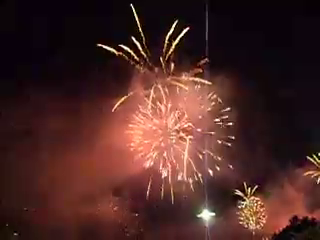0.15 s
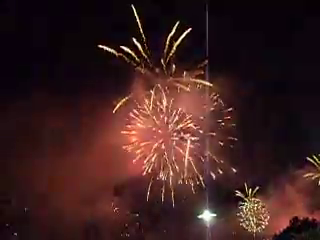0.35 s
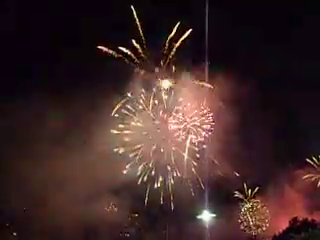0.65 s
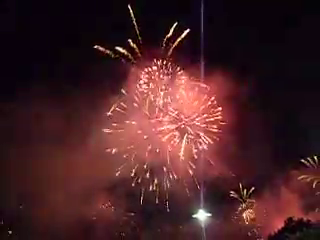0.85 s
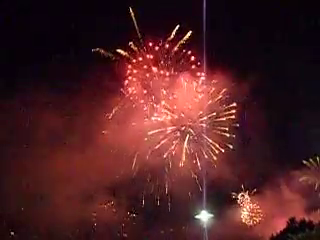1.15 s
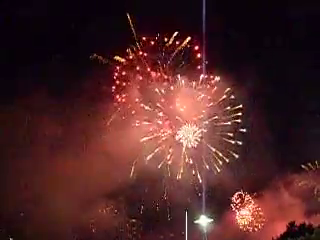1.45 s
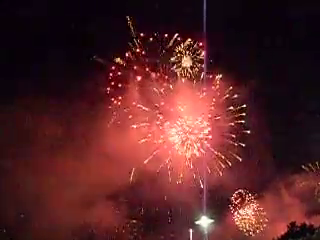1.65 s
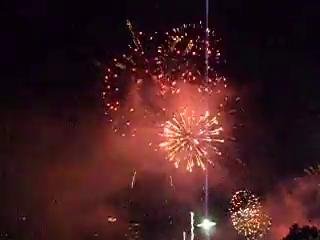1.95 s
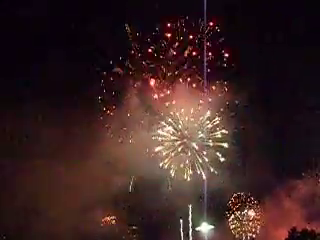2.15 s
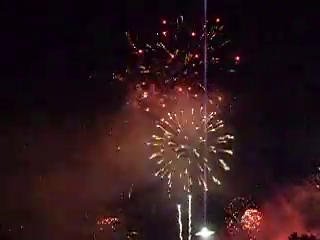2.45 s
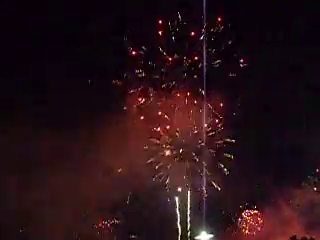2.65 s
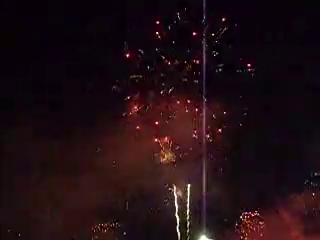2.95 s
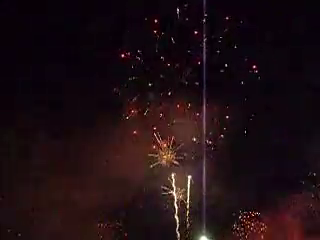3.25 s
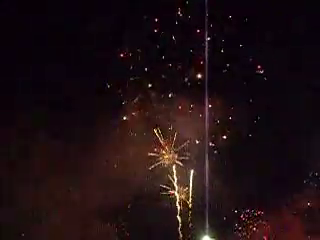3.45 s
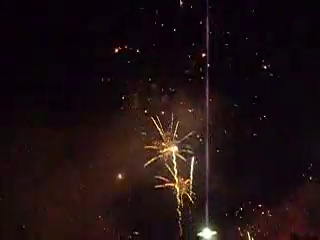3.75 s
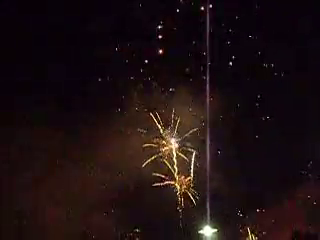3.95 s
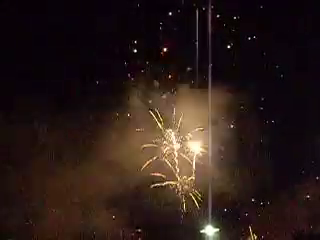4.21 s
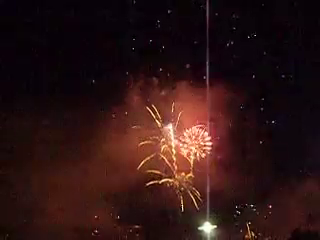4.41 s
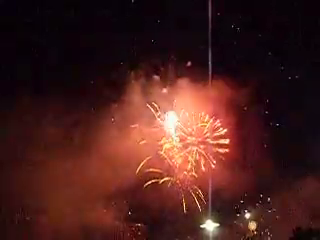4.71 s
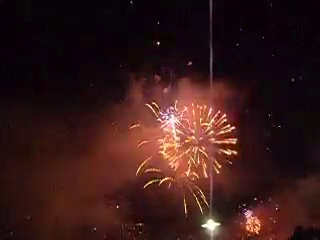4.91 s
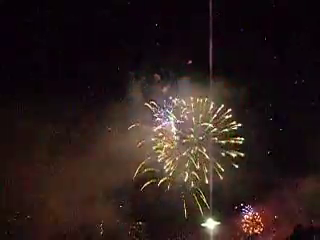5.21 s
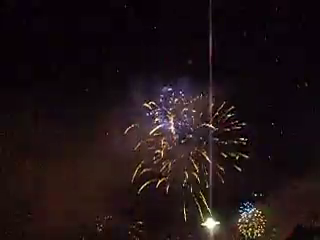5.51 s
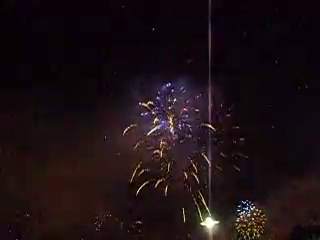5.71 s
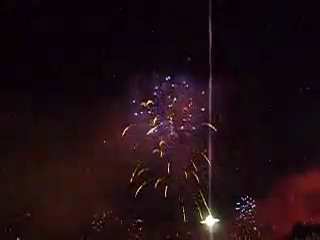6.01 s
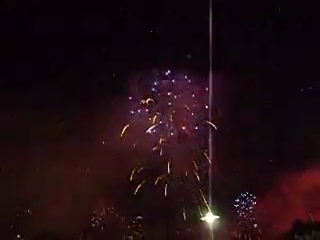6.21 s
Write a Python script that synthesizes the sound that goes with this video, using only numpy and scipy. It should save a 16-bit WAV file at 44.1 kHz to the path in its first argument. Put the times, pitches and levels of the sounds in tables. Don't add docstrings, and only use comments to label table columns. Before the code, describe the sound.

A busy fireworks display heard from open ground: irregular booms, some rounded and dull, others steep and cracking, with light pops between them and deep launch thumps beneath. Echoes slap back quickly and fade slowest in the bass, merging with distant shells into a continuous rumble. Bursts crowd together after the middle, then late strong bangs give way to weaker pops. The small microphone flattens and distorts the big hits.

```python
import sys
import numpy as np
from scipy import signal
from scipy.io import wavfile
from scipy.ndimage import uniform_filter1d

SR = 44100
rng = np.random.default_rng(int(sys.argv[2]) if len(sys.argv) > 2 else 0)


def boost_factor(decibels):
    exponent = np.asarray(decibels, float) / 20
    return 10 ** exponent


def to_wav(sig):
    pcm = np.clip(np.atleast_2d(sig), -1, 1) * 32767
    pcm = np.round(pcm).astype(np.int16)
    wavfile.write(sys.argv[1], SR, pcm.T)


N = 280917

# (time [s], overpressure [dB], steep share of the front [0-1], echo roll [dB], crack [dB])
LARGE_SHELLS = [(0.076, -3.5, 0.1, -9, -10.5), (0.241, 1.5, .05, -9, -21), (0.5989, 11, 0.4, 0, 2),
                (0.6904, 0, 0.5, -17.5, -7), (0.967, -0.5, 0, -13.5, -18), (1.3906, 10, 1, 0.5, -9.5),
                (1.4534, 5, .05, -9.5, -14), (1.4745, 4.5, .2, -15, -21), (1.5431, 3, 0.95, -1, 6),
                (1.7266, 0, .05, -20.5, -18.5), (2.2111, 0, 0, -3, -8), (2.4537, 15, 0.9, 1.5, 12),
                (2.509, 8.5, 0.2, -9, -12), (3.167, -8, .15, -8.5, -6.5), (3.3997, 3, .03, -5.5, -11),
                (3.648, 5, .05, -4, -8.5), (3.7355, -1.7, .6, -19, -28), (3.879, 11, .99, -8, -4.5),
                (3.947, -0.5, .3, -10, -14), (4.2205, -3, 0.6, -8.5, -21),
                (4.4335, -2.5, .05, -12.5, -20.5), (5.1853, 11, .1, 2, -12), (5.5517, 8, .99, -2.5, 9.5),
                (6.0311, -6, 0.4, -11.5, -12)]
# (time [s], overpressure [dB], echo roll [dB], crack [dB], boom [dB])
SMALL_SHELLS = [(0.5757, -6.5, -18.5, -23, -11.5), (0.668, -15, -7, -19, -1), (0.7331, -5.5, -22, -14, -23),
                (1.165, -9, -30, -15.5, -19), (2.2926, -7, -15, -7, -2.5), (2.7642, -1.5, -17.5, -21, -4.5),
                (3.091, -9.5, -27, -16.5, -23), (3.2261, -7, -15, -19, -15), (3.2374, -1.5, -16.5, -18, -7),
                (3.489, -2, -17, -28, -19), (3.632, -2.2, -10, -33, -14), (3.7162, -3.5, -7, -28.5, -12.5),
                (3.893, 0.3, -21, -12.5, -12), (4.1557, -2.5, -12.5, -24, -7),
                (4.369, -4, -18.5, -19, -12.5), (4.5298, -3.5, -14, -16, -23),
                (4.6254, -6.5, -27, -22, -13), (4.767, -3, -14, -17, -8), (5.0168, -9.5, -27, -27, -19),
                (5.2487, -13, -9, -13, -4), (5.374, -2.5, -11.5, -22, -12),
                (5.6427, -2.5, -19, -28.5, -13.5), (6.0096, -13, -17, -32.5, -11)]
# (time [s], overpressure [dB], steep share [0-1])
WALL_RETURNS = [(0.0053, -1.5, 0.2), (0.0229, -1.5, 0), (0.0567, 0, 0.2), (1.1817, -17, .3),
                (1.5624, 0.5, 0.1), (1.611, -1.5, .05), (1.6308, 0, .22), (2.522, 2, .2),
                (2.556, -0.5, 0.2), (5.2686, 1, .3), (5.2982, -2.5, .15)]
# (delay [s], level [dB])
BOUNCES = [
    (.0055, -15),
    (0.01, -14.5),
]
# (time [s], crack [dB], echo roll [dB], boom [dB])
STARS = [(0.0045, -16, -4, -2.5), (0.054, -21, -12, -8), (0.1804, -29, -23, -17),
         (0.5343, -33, -25.5, -14.5), (1.0977, -24.5, -34, -16), (1.1827, -17, -30, -18),
         (1.354, -30, -20.5, -3.5), (1.707, -17, -22, -22), (1.7628, -22, -15.5, -1.5),
         (2.0014, -26, -27, -29), (2.083, -20.5, -23.5, -35), (2.25, -9, -11.5, -17),
         (2.2712, -17, -11, -2), (2.7965, -8, -14, -8), (2.809, -21, -31, -26.5),
         (3.072, -31, -15.5, -11.5), (3.1058, -20, -19, -30), (3.1835, -14, -30, -22),
         (3.2836, -14.5, -19, -3), (3.4668, -20, -13.5, -6.5), (3.984, -26, -31, -16),
         (4.2041, -21.5, -14.5, -1), (4.4841, -29, -15.5, -23), (4.6414, -18.5, -34, -17),
         (5.298, -22, -38, -13), (5.5905, -20, -13.5, -19), (5.6203, -20, -6, 2.5), (5.8412, -26, -22, -17),
         (6.0592, -35, -20, -27), (6.0924, -32, -15.5, -9)]
# (rise [s], quick t60 [s], slow t60 [s], slow part [dB], offset [dB])
ECHO_DECAY = [
    (0.012, 0.21, 0.93, -10.5, -6.5),
    (0.0017, 0.13, 0.8, -12.5, -6.5),
    (0.0032, 0.055, 0.72, -11, -7),
]
# (frequency [Hz], level per Hz [dB])
LOW_SPECTRUM = [(59, -32), (100, -1.5), (151, -1), (220, -3.5), (303, -12), (400, -15), (520, -50),
                (880, -120)]
MIDDLE_SPECTRUM = [(200, -44), (300, 0.5), (360, -8.5), (450, 3), (650, -2), (860, -4), (1050, -8.5),
                   (1200, -23), (1350, -33), (1600, -45)]
BRIGHT_SPECTRUM = [(900, -13), (1200, -12), (1500, -5), (2000, -2.5), (2600, -4.5), (3200, -8),
                   (3700, -13.5), (5000, -14), (6400, -18), (7200, -31.5), (7900, -40), (9000, -70)]
# (time [s], thump [dB])
MORTARS = [(0.01, -17), (.35, -17), (.62, -8), (.76, -17), (1.0, -17), (1.27, -15), (1.42, -12),
           (1.54, -5.5), (2.05, -12.5), (2.3, -13.5), (2.46, -3), (3.05, -11.5), (3.18, -12), (3.4, -17),
           (3.7, -16), (3.87, -13), (3.97, -16), (4.2, -8.5), (4.51, -14), (4.76, -10.5), (5.21, -11.5),
           (5.37, -12), (6.0, -13.5)]
# (frequency [Hz], level per Hz [dB])
DEEP_SPECTRUM = [(12, -33), (20, -9.5), (54, 1.5), (120, -1), (160, -20.5), (260, -120)]
# (time [s], level [dB])
FAR_RUMBLE = [(0.0, -18.5), (0.44, -29), (0.82, -23), (1.08, -27.5), (1.42, -25.5), (1.58, -16.5),
              (1.83, -24.5), (2.23, -26.5), (2.41, -22), (2.87, -26.5), (3.53, -25), (5.11, -28),
              (5.39, -24.5), (6.37, -29)]
# (mean [dB], share of the swing [factor])
RUMBLE_RANGES = [
    (-21, 1.1),
    (-27.5, .9),
    (-46, 1),
]


def lowpass(x, order, hz):
    return signal.sosfilt(signal.butter(order, hz, fs=SR, output="sos"), x + 1e-18)


def bandpass(x, order, low_hz, high_hz):
    sos = signal.butter(order, [low_hz, high_hz], "band", fs=SR, output="sos")
    return signal.sosfilt(sos, x + 1e-18)


def impulses(at, level):
    train = np.zeros(N)
    np.add.at(train, at, level)
    return train


def shell_rows():
    rows = []
    for s, blast_db, steep, roll_db, crack_db in LARGE_SHELLS:
        boom_db = roll_db + 3.5 + 0.1 * (blast_db - roll_db)
        rows.append((s, blast_db, steep, roll_db, crack_db, boom_db))
    for s, blast_db, *rest in SMALL_SHELLS:
        rows.append((s, blast_db, 0.06, *rest))
    return np.array(rows)


def blasts():
    push_ms, push_growth = 1.4, 0.2
    gain_db, fade, far_air_hz = 1.06, 1.91, 1650
    steep, rounded = np.zeros((2, N + 2048))
    t_ms = np.arange(2048) / SR * 1000
    for s, db, share in [*shell_rows()[:, :3], *WALL_RETURNS]:
        u = t_ms / (push_ms * boost_factor(push_growth * db))
        wave = -boost_factor(db + gain_db) * np.cos(np.pi / 2 * u) * np.exp(-(u / fade) ** 2)
        i = round(s * SR)
        steep[i:i + 2048] += share * wave
        rounded[i:i + 2048] += wave
    rounded = lowpass(rounded[:N], 3, far_air_hz)
    steep = steep[:N] - lowpass(steep[:N], 2, far_air_hz)
    out = rounded + steep
    for delay_s, db in BOUNCES:
        out = out + boost_factor(db) * np.pad(rounded, (round(delay_s * SR), 0))[:N]
    return out


def cracks(at, crack_db, edge_db):
    edge_hz = 4070
    snap = impulses(at, -boost_factor(crack_db + 20.5))
    edge = impulses(at, -boost_factor(crack_db + edge_db + 16.5))
    snap = lowpass(bandpass(snap, 1, 1500, edge_hz), 2, edge_hz)
    return snap + bandpass(edge, 1, edge_hz, 6800)


def knocks(at, roll_db):
    kicks = lowpass(impulses(at, -boost_factor(roll_db - 1)), 2, 1790)
    r = boost_factor(-60 / (0.02 * SR))
    out = 0
    for hz in [439, 769]:
        w = 2 * np.pi * hz / SR
        out = out + signal.lfilter([0, np.sin(w)], [1, -2 * r * np.cos(w), r * r], kicks)
    return out


def scattered(at, bright_db):
    late, size, edge = rng.random((3, len(at), 12))
    delay_s = late * 0.073 + 0.003
    when = np.minimum(at[:, None] + (delay_s * SR).astype(int), N - 1)
    db = bright_db[:, None] - 5 - 10 * late + 4 * (2 * size - 1)
    return cracks(when.ravel(), db.ravel(), -22 + 14 * edge.ravel())


def bursts():
    s, _, steep, roll_db, crack_db, boom_db = shell_rows().T
    star_s, star_crack_db, star_roll_db, star_boom_db = np.transpose(STARS)
    edge_db = np.r_[-19.5 + 9 * steep, np.full(len(star_s), -22.5)]
    low_db = np.r_[boom_db, star_boom_db]
    roll_db = np.r_[roll_db, star_roll_db]
    crack_db = np.r_[crack_db, star_crack_db]
    bright_db = roll_db - 13.5 + 0.2 * (crack_db - roll_db)
    return np.r_[s, star_s], crack_db, edge_db, [low_db, roll_db, bright_db]


def fading(kicks, t60):
    return signal.lfilter([1], [1, -boost_factor(-120 / (t60 * SR))], kicks + 1e-18)


def roll(at, burst_db, far_db, rise, quick, slow, slow_db, offset_db):
    kicks = impulses(at, boost_factor(burst_db + offset_db) ** 2)
    power = fading(kicks, quick) + boost_factor(slow_db) ** 2 * fading(kicks, slow)
    r = np.exp(-1 / (rise * SR))
    swelling = signal.lfilter([1 - r], [1, -r], power)
    return np.sqrt(swelling + boost_factor(far_db) ** 2)


def rms_one(x):
    return x / np.sqrt(np.mean(x ** 2) + 1e-20)


def drift(rate):
    r = np.exp(-80 * np.pi * rate / SR)
    noise = rng.standard_normal(N // 40 + 2002)
    slow = signal.lfilter([1], [1, -2 * r, r * r], noise)[2000:]
    return np.interp(np.arange(N) / 40, np.arange(len(slow)), rms_one(slow))


def echo_noise(spectrum, patchy_db, flicker, slaps_per_s, slap_share):
    hz, db = np.transpose(spectrum)
    slap_size = boost_factor(7.0 * np.minimum(rng.exponential(1, N), 4))
    slaps = rms_one((rng.random(N) < slaps_per_s / SR) * slap_size)
    white = np.sqrt(1 - slap_share) * rng.standard_normal((2, N)) - np.sqrt(slap_share) * slaps
    white = np.hstack([rng.standard_normal((2, 8192)), white])
    edges = np.geomspace(hz[1] / 1.259, hz[-2], num=10)
    together, out = drift(flicker), 0
    for k, (low, high) in enumerate(zip(edges, edges[1:])):
        band = bandpass(white[k % 2], 2, low, high)[-N:]
        level_db = np.interp(np.log(low * high) / 2, np.log(hz), db)
        flicker_db = patchy_db * (0.76 * together + drift(flicker))
        out = out + band * boost_factor(level_db + flicker_db)
    return rms_one(out)


def evened(x):
    power = uniform_filter1d(x ** 2, round(0.061 * SR)) + 0.02
    return rms_one(x * power ** (-0.37 / 2))


def rolling_echoes(at, levels, far):
    low = echo_noise(LOW_SPECTRUM, patchy_db=1.15, flicker=9.8, slaps_per_s=40, slap_share=0.079)
    middle = echo_noise(MIDDLE_SPECTRUM, patchy_db=1.62, flicker=11.0, slaps_per_s=150, slap_share=0.2)
    bright = echo_noise(BRIGHT_SPECTRUM, patchy_db=1.68, flicker=81.0, slaps_per_s=360, slap_share=0.083)
    out = 0
    for noise, db, far_db, decay in zip([evened(low), middle, bright], levels, far, ECHO_DECAY):
        out = out + noise * roll(at, db, far_db, *decay)
    return out


def mortar_thumps(far_low_db):
    s, thump_db = np.transpose(MORTARS)
    deep = echo_noise(DEEP_SPECTRUM, patchy_db=-0.4, flicker=3.0, slaps_per_s=23, slap_share=0.048)
    level = roll((s * SR).astype(int), thump_db, far_low_db - 5.5,
                 rise=0.14, quick=0.37, slow=0.5, slow_db=-14.5, offset_db=2)
    return evened(deep) * level


def far_rumble():
    swing = np.interp(np.arange(N) / SR, *np.transpose(FAR_RUMBLE)) + 26
    return [db + share * swing for db, share in RUMBLE_RANGES]


def scene():
    s, crack_db, edge_db, levels = bursts()
    at = np.round((s + 0.0001) * SR).astype(int)
    far = far_rumble()
    fronts = cracks(at, crack_db, edge_db) + knocks(at, levels[1]) + scattered(at, levels[2])
    return (fronts + blasts() + rolling_echoes(at, levels, far) + mortar_thumps(far[0]))[None]


def band_limit(x):
    return signal.sosfilt(signal.butter(12, 16200, fs=SR, output="sos"), x)


def record(dry):
    opening = np.minimum(np.arange(N) / 12 + 0.3, 1)
    flat = np.clip(dry, -0.7, 0.7) * opening
    taps = signal.firwin(numtaps=201, cutoff=7266, window="blackman", fs=SR)
    cut = signal.fftconvolve(np.pad(flat[0], 100, "edge"), taps, "valid")[None]
    cut = cut + boost_factor(-37) * (flat - cut)
    return band_limit(np.clip(cut, -0.714, 0.714))


dry = scene()
out = record(dry)
to_wav(out)
```